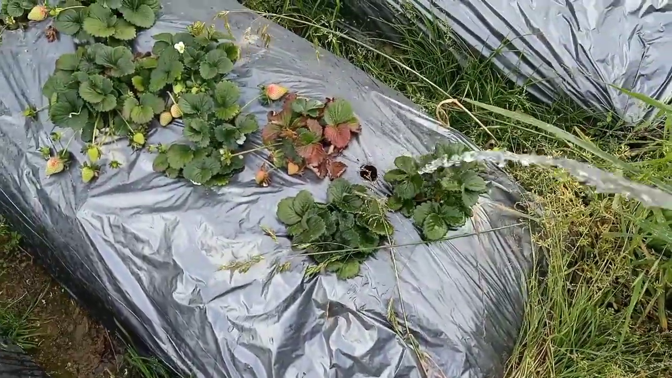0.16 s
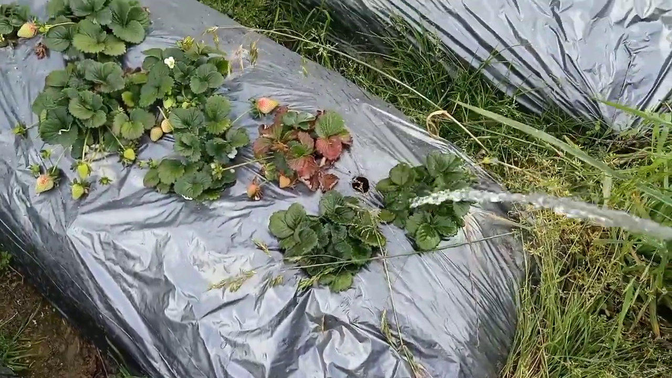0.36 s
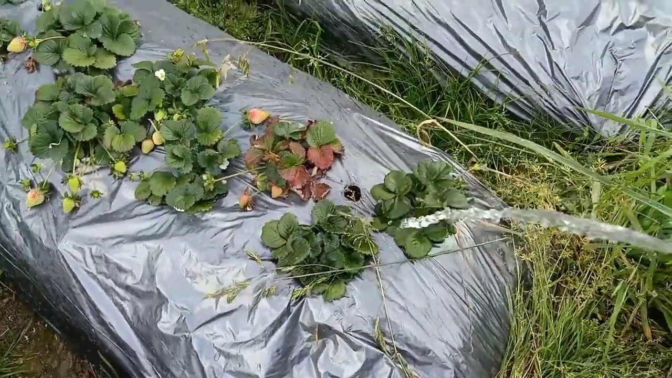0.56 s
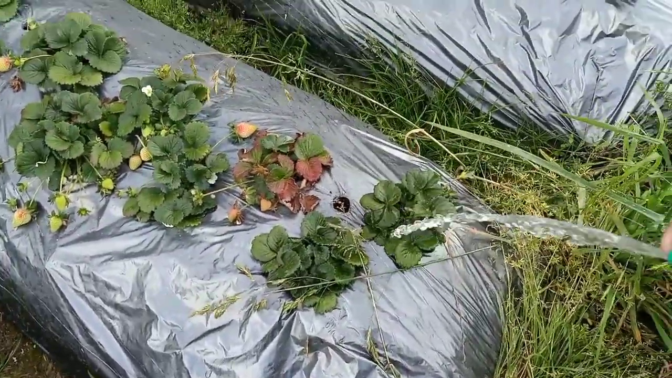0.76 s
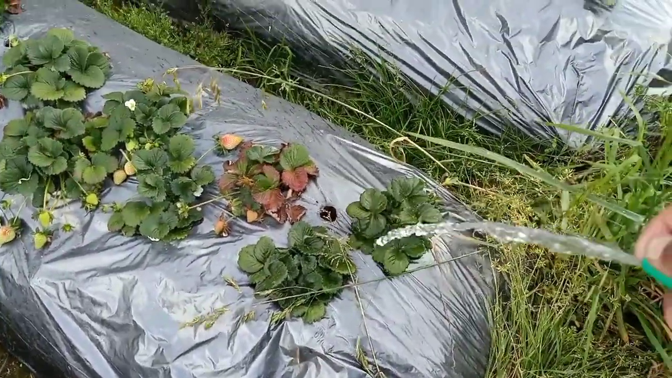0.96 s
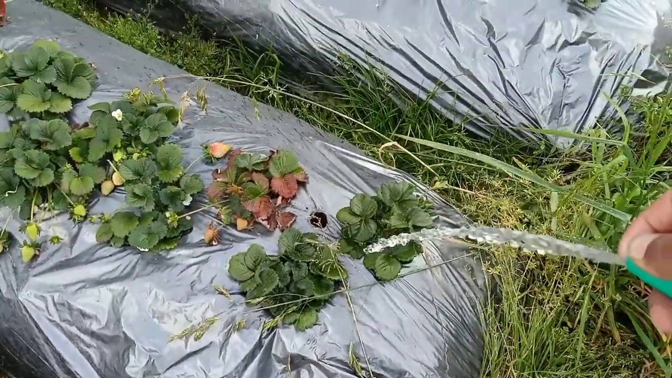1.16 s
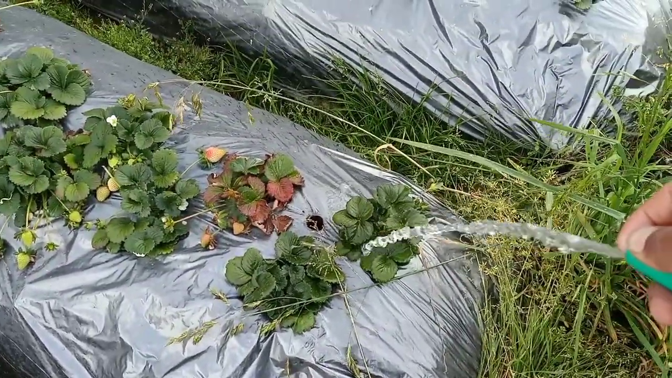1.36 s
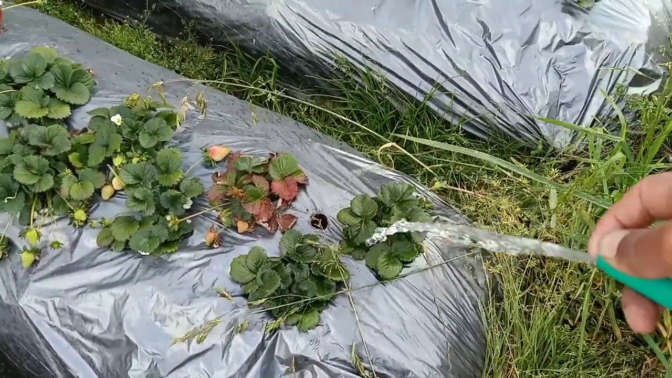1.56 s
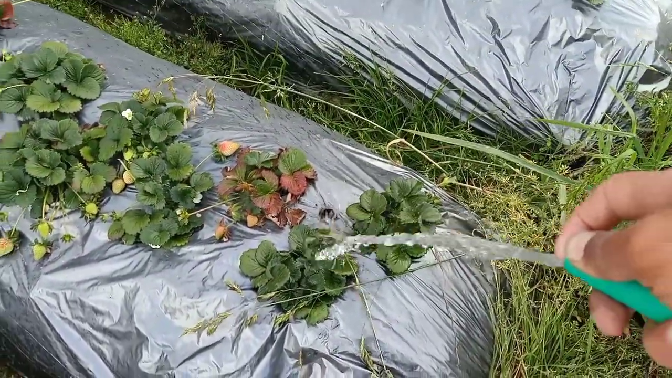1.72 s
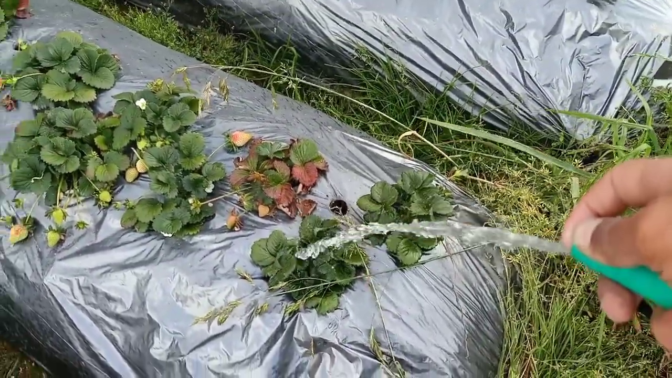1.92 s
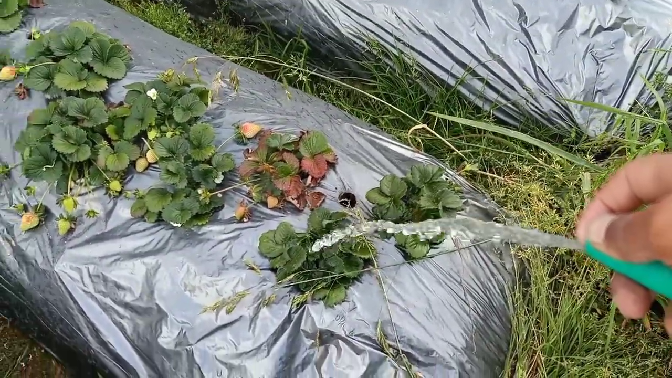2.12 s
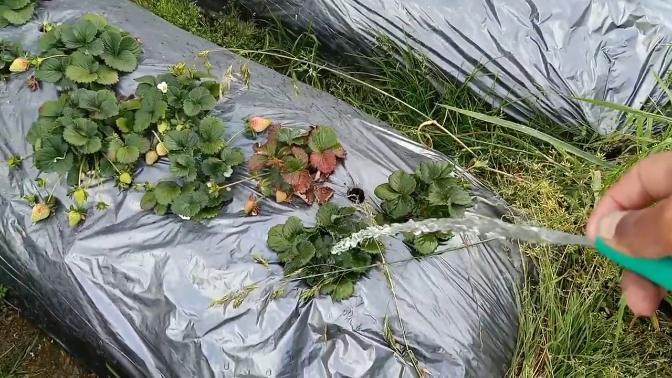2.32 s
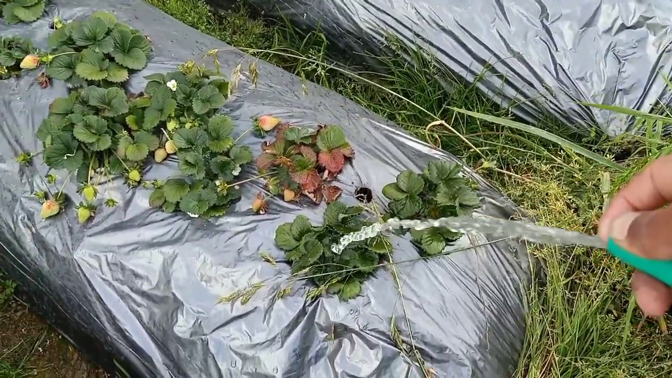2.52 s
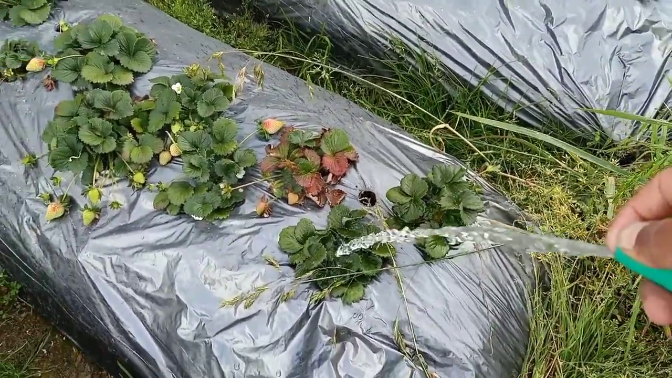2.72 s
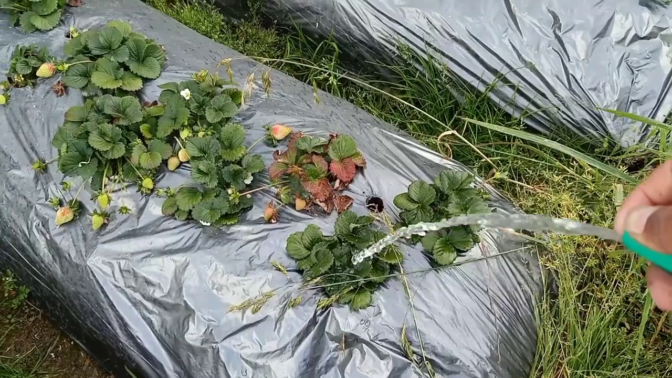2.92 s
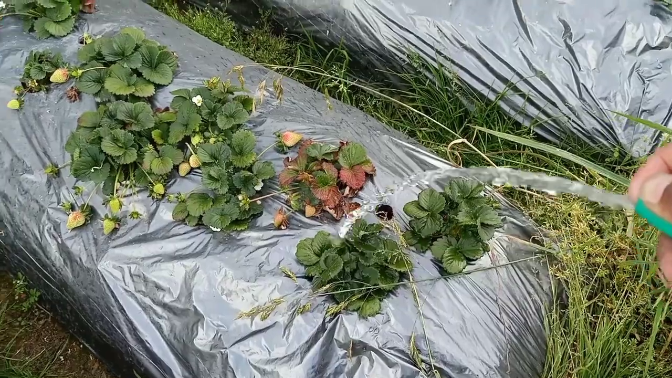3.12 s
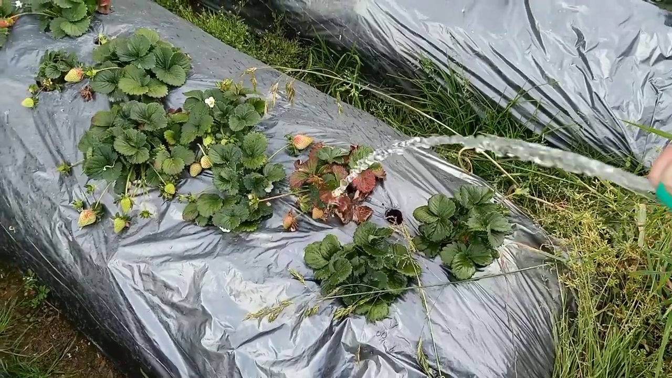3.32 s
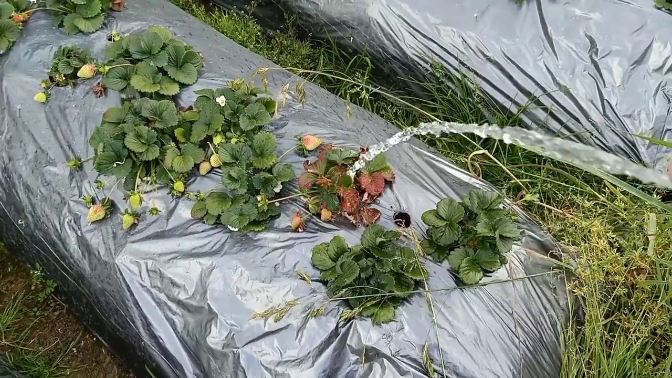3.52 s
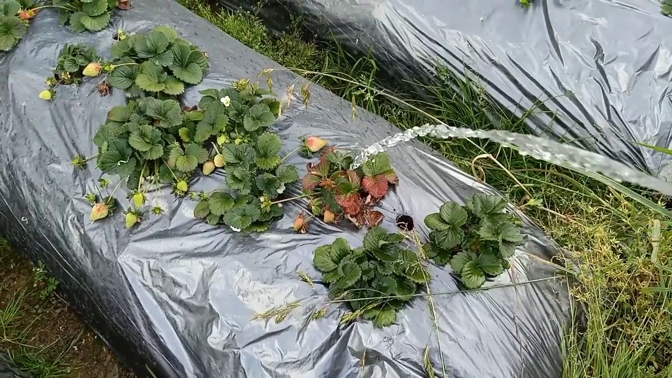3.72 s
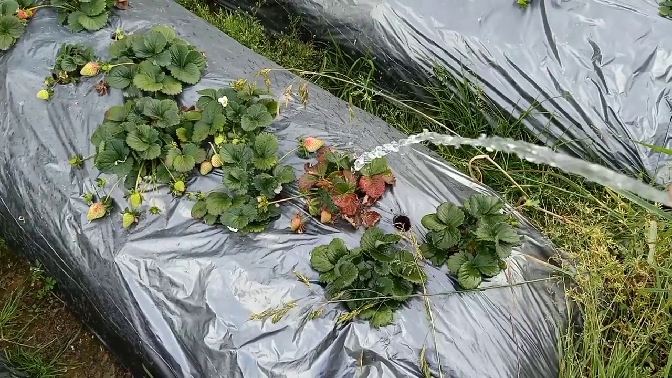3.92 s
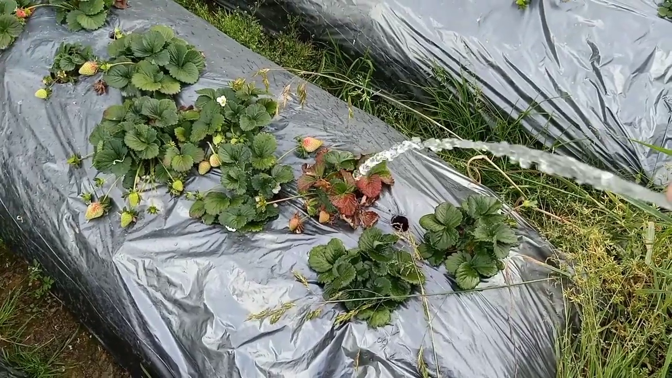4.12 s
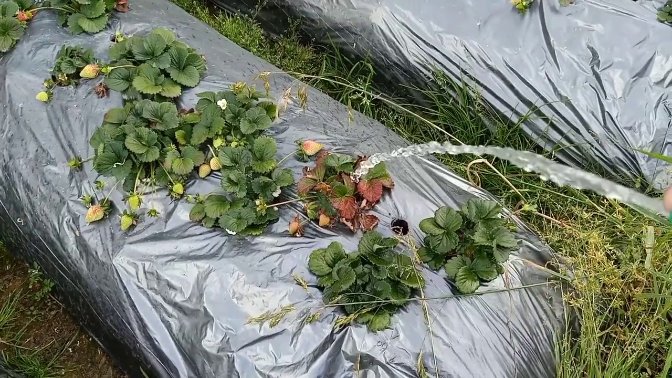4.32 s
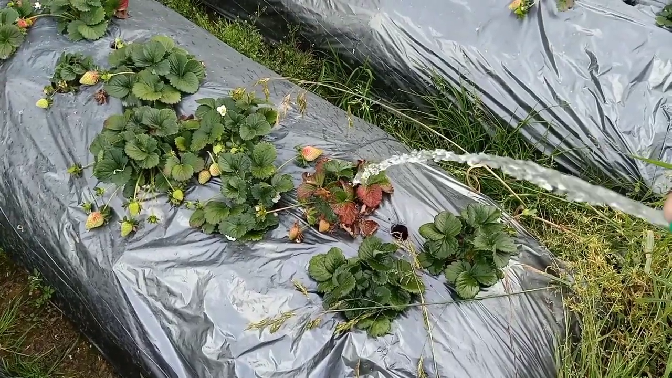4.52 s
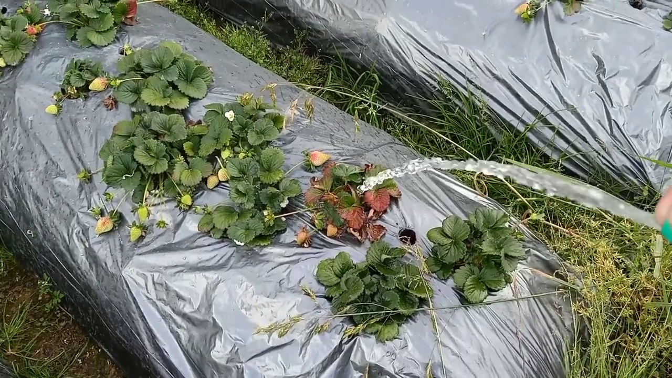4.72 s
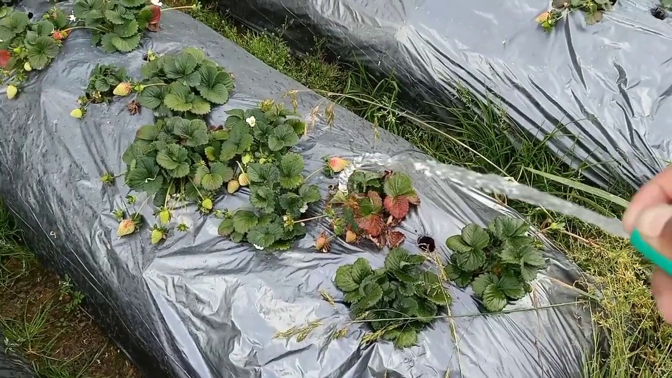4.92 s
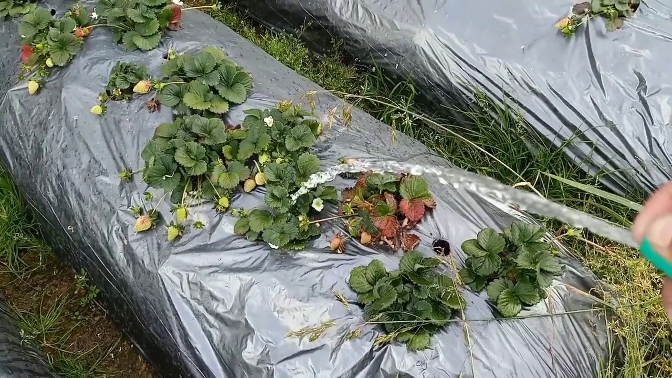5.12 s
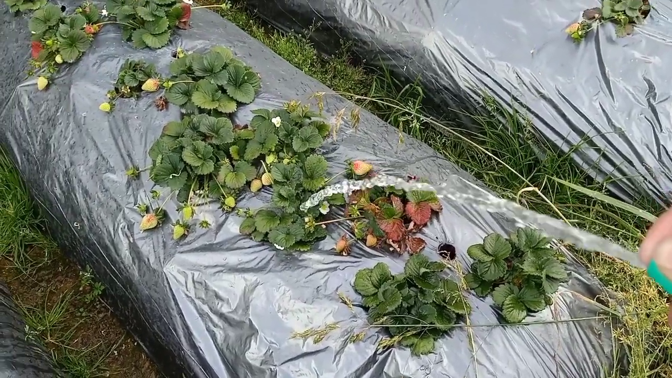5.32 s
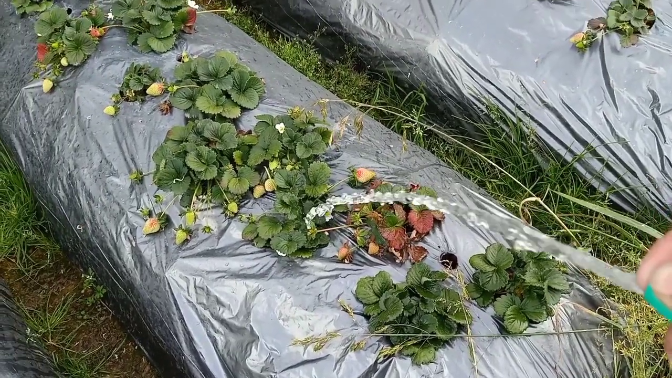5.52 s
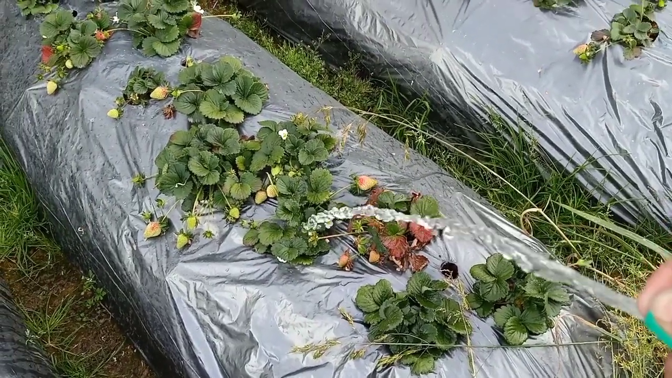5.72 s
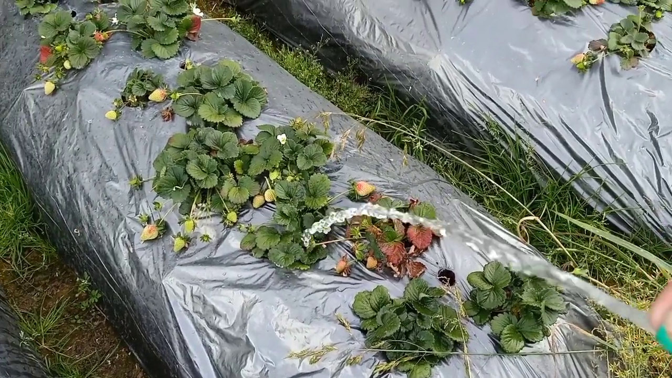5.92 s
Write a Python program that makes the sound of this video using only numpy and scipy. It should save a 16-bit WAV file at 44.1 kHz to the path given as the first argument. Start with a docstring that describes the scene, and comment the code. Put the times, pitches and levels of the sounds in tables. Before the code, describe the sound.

Continuous irregular water patter, close and dry in open air: soft noisy drops on leaves, hollow flutters and slaps on loose plastic, fine spray ticking all around. It starts busy, thins out, picks up to a hard wet slap around the middle, turns into thick knocking patter on stiff leaves, then falls back to hissy spitting, with low wind puffs late. Small stereo recorder, slightly brighter at left.

```python
"""Drops patter on low leafy plants and drum on the plastic sheet between them; fine spray ticks all around.
They come from a slack garden-hose stream that swings across. Each drop is a blow of force, shaped by the spectrum
of what it strikes; drops too small to tell apart become a wash of noise, and the heaviest ring at a pitch.
Light wind puffs in rumbling noise at two unlike microphone ports."""
import sys
import numpy as np
from scipy import signal
from scipy.fft import rfft, irfft, next_fast_len
from scipy.io import wavfile
from scipy.ndimage import uniform_filter1d, map_coordinates

SR = 44100
rng = np.random.default_rng(int(sys.argv[2]) if len(sys.argv) > 2 else 0)


def field_ratio(decibels):
    """Amplitude ratio for a level in dB (20 dB per decade); scalars and array-likes work."""
    return 10 ** (np.asarray(decibels, dtype=float) / 20)


def master_out(mix):
    """Clip the mix to full scale and print it as 16-bit PCM to the path in sys.argv[1]."""
    frames = np.transpose(np.atleast_2d(mix))
    ceiling = np.clip(frames, -1, 1)
    pcm = np.round(ceiling * 32767).astype(np.int16)
    wavfile.write(sys.argv[1], SR, pcm)


N = 267246

# Spectra of what the water excites. Each row: frequency in Hz, relative level in dB.
# The hollow drumming of the sheet
SHEET = [(150, -23), (300, -5), (400, -3), (540, -0.5), (750, -4.5), (1200, -13), (2500, -76)]
# The sharper slap of water on the sheet
SLAP = [(300, -58), (650, -14.5), (950, -5), (1400, -6.5), (2000, -1), (4000, -79)]
# The air booming under the sheet
BOOM = [(50, -54), (110, -7.5), (170, -0.5), (250, -2), (330, -7.5), (600, -26.5)]
# Soft leaves
LEAF = [(500, -51), (1200, -14), (1700, -3.5), (2400, 2.5), (3000, -2), (3800, -18.5), (4500, -24),
        (8000, -77)]
# Coarse fizz
FIZZ = [(1500, -56), (2500, 2), (3200, -4.5), (3800, -1), (4300, -3), (5200, -4), (6200, -15.5),
        (10000, -74)]
# Fine spray
SPRAY = [(2500, -60), (4800, -6.5), (6000, 0), (6800, 1.5), (7250, 3), (7700, -0.5), (9000, -5.5),
         (11000, -26.5), (16000, -50)]
# The finest mist
FINEST = [(5000, -56), (8500, -22), (9800, -1.5), (11500, 0), (12300, -4), (13400, 0.5), (14200, -1.5),
          (15400, -1.5)]

# The stream on the plants. Each row: time in seconds, patter level in dB, cover of stiff dense leaves from 0 to 1.
PATTER = [(0, -47, .4), (.14, -39.5, 0.6), (.185, -43, 0.2), (.25, -37.5, .5), (.46, -38.5, 0.23),
          (.6, -41.5, 0.3), (1.3, -41, 0), (1.42, -38.5, 0), (1.63, -43.5, 0.13), (1.9, -44.5, 0.23),
          (2.3, -44, 0.35), (2.45, -43, 0.23), (2.87, -38.5, 0.12), (3.14, -42, 0.17), (3.33, -39.5, 0.5),
          (3.49, -52.5, 0.77), (3.68, -39, 0.34), (3.78, -36, 0.53), (4.19, -36, 0.45), (4.3, -37.5, 0.63),
          (4.6, -37, 0.4), (4.92, -37, 0.6), (4.95, -45, .5), (5.2, -46, 0.17), (5.33, -48, 0.18),
          (5.62, -47.5, 0.42), (5.92, -44.5, 0.1), (6.06, -44, 0.48)]
# What the stream throws off. Each row: time in seconds, spray level in dB, coarse fizz over the spray in dB,
# finest mist over the spray in dB.
SCATTER = [(0, -51, -3, -7), (.4, -49, -3.5, -5), (.66, -51, 7, -2), (.8, -50.5, 5.5, -3),
           (1.0, -51.5, 6, -5), (1.63, -54, 9, -3), (1.7, -48, 2, -7), (1.9, -49.5, -1, -4),
           (2.3, -50, 0, -2.5), (2.65, -45.5, -2.5, -6), (3.0, -45, -2.5, -3.5), (3.15, -49.5, 1.5, -6),
           (3.42, -45, -5.5, -9), (3.5, -48.5, -2.5, -8), (3.8, -48, -1.5, -6.5), (4.25, -49.5, -4, -4.5),
           (4.57, -48.5, -3.5, -8.5), (4.93, -51.5, 3, -5.5), (5.15, -49, -3.5, -8),
           (5.33, -48.5, -4.5, -11), (5.38, -39.5, -6.5, -14), (5.45, -46, -4, -9.5), (5.7, -45, -3.5, -12),
           (5.86, -42.5, -1, -5.5), (5.93, -46, 0.5, -9), (6.06, -49.5, -2, -10)]
# Likeness of the two ports. Each row: frequency in Hz, left-right correlation (1 = identical).
ALIKE = [(40, 0.92), (80, 0.89), (130, 0.87), (380, 0.93), (700, 0.82), (1290, 0.77), (2380, 0.85),
         (4400, .62), (8120, 0.25), (15000, .1)]

CONTACT_S = 0.0009  # from first touch to the peak of a blow on a leaf


def unit(x):
    """Scale to rms 1."""
    return x / np.sqrt(np.mean(x ** 2) + 1e-20)


def along(points, hz):
    """Read (Hz, value) points on a log frequency axis."""
    f, v = np.transpose(points)
    return np.interp(np.log(hz + 1), np.log(f + 1), v)


def curves(rows):
    """One value per sample for each column after the time."""
    s, *columns = np.transpose(rows)
    t = np.arange(N) / SR
    return [np.interp(t, s, column) for column in columns]


def wobble(rate):
    """A smooth random curve with rate knots a second."""
    knots = rng.standard_normal(N // 100)
    return map_coordinates(knots, [np.arange(N) * rate / SR])


def filtered(x, response):
    """Multiply the spectrum of x by a complex response of frequency."""
    m = next_fast_len(N + 8192)
    hz = np.fft.rfftfreq(m, 1 / SR)
    return irfft(rfft(x, m) * response(hz), m)[..., :N]


def body(x, spectrum):
    """What a struck surface makes of the force x; a lone unit blow peaks at 1."""
    peak = np.mean(field_ratio(along(spectrum, np.fft.rfftfreq(4096, 1 / SR))))
    return filtered(x, lambda hz: field_ratio(along(spectrum, hz)) / peak)


def arrivals(rate, spread_db, clumps_db):
    """Random drops, rate a second, few big and many small; the stream sheds them in clumps."""
    chance = rng.random(N)
    size = np.minimum(rng.exponential(size=N), 4)
    return (chance < rate / SR) * field_ratio(spread_db * size + clumps_db)


def splatter(drops, life, wash):
    """Each drop spreads as a burst of noise dying over life seconds, on a wash of drops too small to tell apart."""
    spread = signal.lfilter([1], [1, -np.exp(-1 / (life * SR))], drops)
    return (unit(spread) + wash) * rng.standard_normal(N)


def blows(rows, db, splash, life):
    """One clean blow at each row's time, then a little noisy splash dying over life seconds."""
    force = np.zeros(N)
    force[np.round(np.array(rows)[:, 0] * SR).astype(int)] = field_ratio(db)
    after = signal.lfilter([0, splash], [1, -np.exp(-1 / (life * SR))], force)
    return force + after * rng.standard_normal(N)


def knocks(rows, rise, fall):
    """A few cycles at each row's pitch, swelling for rise cycles to the peak and dying over fall cycles."""
    out = np.zeros(N + SR)
    for s, db, hz in rows:
        turns = np.arange(int(12 * SR / hz)) * hz / SR  # cycles since first touch
        shape = np.exp(-turns / fall) * (1 - np.exp(-(turns / rise) ** 2))
        top = shape.argmax()
        ring = field_ratio(db) * shape / shape[top] * np.cos(2 * np.pi * (turns - turns[top]))
        out[round(s * SR) - top:][:len(turns)] += ring
    return out[:N]


def scattered_rows(count, level_db, spread_db):
    """Random events: time, level a little around level_db at that time, and a spare normal number."""
    s = rng.uniform(0.01, N / SR - 0.01, size=count)
    draw = np.clip(rng.standard_normal((count, 2)), -2, 1)
    db = level_db[(s * SR).astype(int)] + spread_db * draw[:, 0]
    return s, db, draw[:, 1]


def crossings():
    """Gains of drumming, slap and boom while the stream is on bare sheet: a steep rise, a hold, a slower fall."""
    # Each row: start of the hold in seconds, hold in seconds, drumming level in dB,
    # slap over drumming in dB, boom over drumming in dB.
    visits = [(0.077, 0.007, -45.5, 3, -6), (.115, 0.022, -43.5, 2, -3.5), (.215, .2, -45.5, 2, -9.5),
              (.66, 0.071, -54.5, 2, -4.5), (.95, 0.068, -58, -19, -15), (1.398, 0.011, -46.5, -11, -12),
              (1.57, 0.014, -46, 2, -24), (1.68, 0.01, -48, 4, -18), (1.742, 0.033, -42, 2, -9.5),
              (2.37, 0.19, -59.5, 11, -12), (2.86, 0.012, -54, 7, -20), (2.98, 0.026, -51, 0, -20),
              (3.21, 0.039, -37.5, 5.5, -11.5), (3.27, 0.04, -45.5, 8, -7), (3.34, 0.079, -48, 0.5, -15.5),
              (5.059, 0.036, -43.5, 5.5, -4), (5.131, 0.017, -45, 7, -6), (5.185, 0.011, -51.5, 3.5, -12),
              (5.39, 0.01, -58, 9, -14), (5.85, 0.02, -55.5, 3, -2)]
    attack_db_per_s, release_db_per_s = 516, 356
    t = np.arange(N) / SR
    power = np.zeros((3, N))
    for s, held, db, slap_db, boom_db in visits:
        before_db = attack_db_per_s * np.maximum(s - t, 0)
        after_db = release_db_per_s * np.maximum(t - s - held, 0)
        balance_db = np.array([[0], [slap_db], [boom_db]])
        power += field_ratio(2 * (db - before_db - after_db)) * field_ratio(2 * balance_db)
    return np.sqrt(power)


def air():
    """Lumpy wind rumble with short gusts, the boom of air under the sheet, and a few soft low bumps."""
    # Wind spectrum. Each row: frequency in Hz, relative level in dB.
    rumble_spectrum = [(10, -36), (30, -6), (60, -11.5), (100, -0.5), (140, -2), (300, -42)]
    # Short gusts. Each row: time of the crest in seconds, level in dB.
    gusts = [(.05, -70), (1.43, -58), (2.16, -72), (2.41, -85), (3.24, -71), (3.86, -82), (4.64, -83),
             (5.2, -67), (5.62, -56.5), (5.86, -57), (6.06, -58)]
    # Low bumps. Each row: time of the peak in seconds, level in dB, pitch in Hz.
    thuds = [(2.04, -60, 60.3), (5.58, -44, 92), (5.626, -48.5, 60), (5.861, -41, 91.5), (6.045, -48.5, 70)]
    wind_db, gust_s, boom_rest_db = -70.5, 0.019, -67
    t = np.arange(N) / SR
    wind = field_ratio(wind_db + 3.5 * wobble(5.18))
    for s, db in gusts:
        wind += field_ratio(db) * np.exp(-((t - s) / gust_s) ** 2)
    under = np.hypot(crossings()[2], field_ratio(boom_rest_db + 0.75 * wobble(5.88)))
    rumble = wind * field_ratio(3.5 * wobble(10)) * unit(body(rng.standard_normal(N), rumble_spectrum))
    boom = under * field_ratio(2.1 * wobble(25)) * unit(body(rng.standard_normal(N), BOOM))
    return rumble + boom + knocks(thuds, rise=0.7, fall=0.33)


def spits():
    """Small fast drops tick on stiff leaf edges and taut plastic: brief blows on the bright spectra."""
    # The sharpest ticks. Each row: first touch in seconds, level in dB.
    sharpest = [(0.0406, -30), (0.1092, -26), (0.2493, -30), (0.4085, -38), (0.4197, -24), (0.726, -38),
                (0.7248, -23.5), (0.9528, -30), (1.221, -31), (1.5643, -32), (1.957, -30), (2.598, -29),
                (2.9135, -27), (3.0316, -26), (3.1436, -23), (3.342, -24.5), (3.4346, -23.5), (3.8375, -22),
                (3.9464, -23.5), (4.4, -28), (4.5502, -35), (4.6354, -37), (4.7699, -30), (5.05, -20.5),
                (5.1013, -29), (5.2027, -23.5), (5.2542, -29), (5.3602, -37), (5.4786, -18.5),
                (5.6004, -28), (5.6999, -29), (5.7383, -25), (5.7932, -25), (5.8142, -29)]
    over_spray_db, spread_db = 17.5, 1  # the other ticks
    fizz_db, fizz_spread_db = -11, 4.5
    spray_db = curves(SCATTER)[0]
    s, db, _ = scattered_rows(count=40, level_db=spray_db + over_spray_db, spread_db=spread_db)
    rows = np.vstack([np.add(sharpest, [CONTACT_S, 0]), np.c_[s, db]])
    db = rows[:, 1]
    coarse_db = db + fizz_db + fizz_spread_db * np.minimum(rng.standard_normal(len(db)), 1)
    tick = blows(rows, db, splash=0.39, life=0.00029)
    bright = 1.01 * body(tick, SPRAY) + 0.54 * body(tick, FINEST)
    return bright + body(blows(rows, coarse_db, splash=0.27, life=0.0013), FIZZ)


def big_drops():
    """Heavy drops knock a leaf at its pitch, push the sheet under it and throw a little spray."""
    # The biggest drops on leaves. Each row: first touch in seconds, level in dB, pitch in Hz.
    biggest = [(0.0402, -26, 2450), (0.1107, -20, 2150), (0.21, -22, 2380), (0.2188, -19, 2100),
               (0.2738, -22, 2320), (0.389, -20, 2010), (0.4194, -18, 2380), (0.4474, -28, 2680),
               (0.7075, -22, 2760), (0.7629, -20, 2560), (1.0911, -28, 1900), (1.1064, -24.5, 1970),
               (1.349, -26, 2510), (1.4546, -24, 2470), (1.478, -25, 2780), (1.6761, -15.5, 3140),
               (1.8832, -23, 2590), (2.2078, -22.5, 2620), (2.3686, -37, 2150), (2.4159, -21.5, 1980),
               (2.4624, -29, 2930), (2.4686, -16.5, 2520), (2.4852, -20, 2200), (2.501, -19, 2490),
               (2.5182, -25, 2770), (2.6748, -24, 2290), (2.928, -23, 2670), (3.035, -25, 1920),
               (3.0823, -18.5, 2620), (3.1967, -31, 1800), (3.2041, -24, 1740), (3.2174, -19, 2540),
               (3.2358, -18, 2470), (3.308, -28, 2510), (3.5995, -25, 2830), (3.6923, -18, 2690),
               (3.6966, -18, 2580), (3.7194, -20.5, 2480), (3.8365, -20.5, 2410), (3.8531, -21, 2250),
               (3.8787, -20, 2500), (3.9426, -19.5, 2500), (3.9752, -19, 2200), (3.9913, -11.5, 2430),
               (4.0714, -21, 2300), (4.0796, -10, 2410), (4.1248, -19.5, 2420), (4.1837, -18, 2440),
               (4.1955, -17.5, 2750), (4.2217, -23, 2430), (4.3427, -24, 2480), (4.3946, -20.5, 2240),
               (4.6388, -16, 2640), (4.6423, -18, 2630), (4.6833, -21, 2840), (4.7418, -19, 2500),
               (4.7627, -18.5, 2340), (4.848, -20, 2430), (4.8576, -17.5, 2700), (4.9895, -20, 2360),
               (5.4782, -27.5, 1900), (5.7688, -24.5, 2600)]
    over_patter_db, spread_db = 12.5, 2.5  # the other heavy drops
    pitch_hz, pitch_spread = 2400, 0.074
    push_db, push_cover_db, push_spread_db = -11, -15, -13.5  # passed on to the sheet, less under full cover
    leaf_db, cover = curves(PATTER)
    s, db, tune = scattered_rows(count=90, level_db=leaf_db + over_patter_db, spread_db=spread_db)
    others = np.c_[s, db, pitch_hz * np.exp(pitch_spread * tune)]
    rows = np.vstack([np.add(biggest, [CONTACT_S, 0, 0]), others])
    s, db, _ = rows.T
    sheet_db = push_db + push_cover_db * cover[(s * SR).astype(int)]
    sheet_db -= abs(push_spread_db * rng.standard_normal(len(s)))
    push = body(blows(rows, db + sheet_db, splash=0.061, life=0.0021), SLAP)
    spatter = body(blows(rows, db - 26, splash=0.3, life=0.00097), SPRAY)
    return field_ratio(-1.0) * knocks(rows, rise=1.21, fall=1.59) + push + spatter


def sheet_drops():
    """On bare sheet every bead of the stream is heard alone; the biggest smack, and a few plop into a hollow."""
    # The biggest drops on bare sheet. Each row: first touch in seconds, level in dB.
    hits = [(0.109, -32), (0.274, -27), (0.42, -38), (1.745, -24.5), (1.784, -39), (1.86, -29),
            (2.368, -24), (2.404, -25.5), (2.845, -28), (3.204, -26), (3.222, -14), (3.23, -22),
            (3.243, -16), (3.246, -27), (3.267, -24), (3.382, -27), (4.555, -23.5), (5.057, -28),
            (5.067, -30), (5.074, -23), (5.082, -29), (5.095, -21), (5.147, -26)]
    # Drops into a hollow of the sheet. Each row: time of the peak in seconds, level in dB, pitch in Hz.
    plops = [(.944, -44, 450), (.957, -41, 520), (.975, -35, 500), (.983, -40, 504), (.989, -35, 480),
             (.995, -32, 485), (1.006, -39, 420), (1.018, -38, 400), (1.028, -41, 520), (1.037, -37, 583)]
    sheet_contact_s = 0.002  # a blow on the sheet peaks this long after its row's time
    beads_per_s, timing_scatter = 150, 0.3  # the stream arrives as a string of beads
    bead_db, bead_spread_db = 4.5, 2.5
    on_drum, on_slap, _ = crossings()
    draw = rng.standard_normal((2000, 2))
    s = np.cumsum(np.exp(timing_scatter * draw[:, 0]) / beads_per_s)
    keep = s < N / SR - 0.01
    levels_db = bead_db + bead_spread_db * draw[keep, 1]
    beads = blows(s[keep, None], levels_db, splash=0.063, life=0.0016)
    smacks = blows(np.add(hits, [sheet_contact_s, 0]), np.transpose(hits)[1], splash=0.087, life=0.0012)
    taut = body(on_slap * beads + 0.72 * smacks, SLAP) + body(0.67 * smacks, LEAF)
    hollow = body(on_drum * beads + 0.15 * smacks, SHEET) + body(0.16 * smacks, BOOM)
    return taut + hollow + knocks(plops, rise=0.8, fall=0.9)


def stream():
    """The same drops sound sheet, leaves and spray; the spray also has small drops of its own."""
    # Stiff dense leaves. Each row: frequency in Hz, relative level in dB.
    stiff_leaf = [(800, -60), (1300, -20), (1700, -13), (2050, -6), (2430, 0), (2900, -6), (3500, -18),
                  (4300, -30), (7000, -70)]
    runoff_db, runoff_slap_db = -51.5, -46.5  # water running off onto the sheet
    cover_db = -11.5  # how much full leaf cover hides the runoff
    rebound_db, rebound_fizz_db = -2, -8.5  # patter and fizz kicked up by a slap on the sheet
    leaf_db, cover = curves(PATTER)
    spray_db, coarse_db, mist_db = curves(SCATTER)
    on_drum, on_slap, _ = crossings()
    hidden_db = cover_db * cover

    clumps_db = 0.8 * wobble(18) + 1.5 * wobble(70)
    shared = arrivals(rate=900, spread_db=3.5, clumps_db=clumps_db)
    fine = arrivals(rate=900, spread_db=5.5, clumps_db=1.4 * clumps_db + 0.41 * wobble(11))

    sheet = unit(body(splatter(shared, life=0.00068, wash=1.0), SHEET))
    slap = unit(body(splatter(shared, life=0.00063, wash=0.79), SLAP))
    patter = splatter(shared, life=0.00025, wash=0.9)
    leaves = (1 - cover) * unit(body(patter, LEAF)) + cover * unit(body(patter, stiff_leaf))
    fizz = unit(body(splatter(2.6 * shared + fine, life=0.00091, wash=0.47), FIZZ))
    spray = unit(body(splatter(0.29 * shared + fine, life=0.00035, wash=0.86), SPRAY))
    mist = unit(body(splatter(fine, life=0.00037, wash=1.6), FINEST))

    # direct and secondary water add in power
    drum_gain = np.hypot(on_drum, field_ratio(runoff_db + hidden_db + 2.7 * wobble(12)))
    slap_gain = np.hypot(on_slap, field_ratio(runoff_slap_db + hidden_db + 0.87 * wobble(12)))
    leaf_gain = np.hypot(field_ratio(rebound_db) * on_slap, field_ratio(leaf_db + 0.43 * wobble(15)))
    fizz_gain = np.hypot(field_ratio(rebound_fizz_db) * on_slap, field_ratio(spray_db + coarse_db))
    spray_gain = field_ratio(spray_db + 0.43 * wobble(20))
    low = drum_gain * sheet + slap_gain * slap + leaf_gain * leaves
    return low + fizz_gain * fizz + spray_gain * spray + field_ratio(spray_db + mist_db) * mist


def patchy(x, depth_db):
    """The landing spot never rests: patches of the spectrum swell and sink for some tens of milliseconds."""
    z = signal.stft(x, nperseg=512)[2]
    field = uniform_filter1d(rng.standard_normal(z.shape), size=4, axis=0)  # smooth over frequency
    field = uniform_filter1d(field, size=8, axis=1)  # smooth over time
    return signal.istft(z * field_ratio(depth_db * unit(field)), nperseg=512)[1][:N]


def ports(x):
    """Both ports hear the direct sound; sound scattered by nearby leaves reaches them in opposite sense."""
    z = signal.stft(x, SR, nperseg=256)[2]
    random_phase = np.exp(2j * np.pi * rng.random(z.shape))
    scattered = signal.istft(z * random_phase, SR, nperseg=256)[1][:N]
    scattered *= np.std(x) / np.std(scattered)
    # this mixing angle gives the wanted correlation
    angle = lambda hz: np.arccos(np.clip(along(ALIKE, hz), -1, 1)) / 2
    direct = filtered(x, lambda hz: np.cos(angle(hz)))
    side = filtered(scattered, lambda hz: np.sin(angle(hz)))
    return np.array([direct + side, direct - side])


def scene():
    """Water and air as they reach the two ports."""
    water = patchy(stream(), depth_db=1.23) + big_drops() + sheet_drops() + spits()
    return ports(water + air())


def port_colour(hz):
    """The ports differ in level and phase by frequency, the right duller on top; their sum stays even."""
    # Each row: frequency in Hz, left minus right in dB.
    lean = [(40, 15), (120, 0), (300, 1), (600, 4.5), (1200, -5.5), (2200, 1.7), (3500, -1.5), (5500, 1.5),
            (9000, 14.5), (15000, 7.5)]
    # Each row: frequency in Hz, phase in radians by which the left leads.
    lead_points = [(400, 0), (780, -.7), (1750, .3), (3000, -.2), (6000, .7), (8500, -1.1), (15500, -2.2)]
    lean_db = along(lean, hz)
    left, right = field_ratio(lean_db / 2), field_ratio(-lean_db / 2)
    lead = along(lead_points, hz)
    alike = np.clip(along(ALIKE, hz), -1, 1)
    both = np.sqrt(left ** 2 + right ** 2 + 2 * alike * np.cos(lead)) / 2
    return np.array([left, right * np.exp(-1j * lead)]) / both


def top_cut(x):
    """Nothing passes above the cut-off."""
    return signal.sosfilt(signal.butter(12, 16690, fs=SR, output="sos"), x)


def record(dry):
    """Port colour, a band limit in two steps and the standing offset of the converter."""
    step_hz, top_hz = 15480, 15830  # 12 dB down from the first, silent from the second
    limit = lambda hz: np.where(hz < step_hz, 1, field_ratio(-12)) * (hz < top_hz)
    coloured = filtered(dry, lambda hz: port_colour(hz) * limit(hz))
    offset = 0.0021
    return top_cut(coloured + offset)


dry = scene()
out = record(dry)
master_out(out)
```